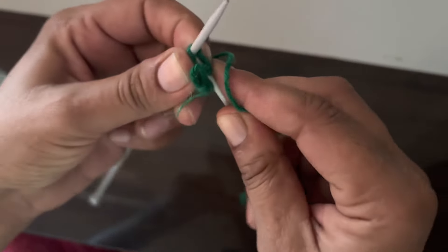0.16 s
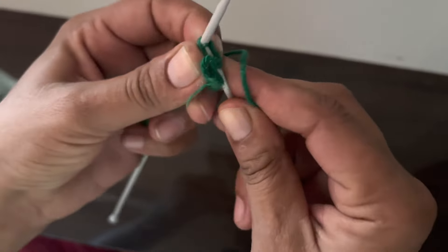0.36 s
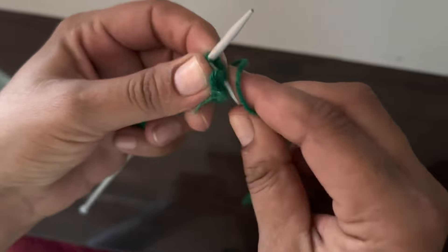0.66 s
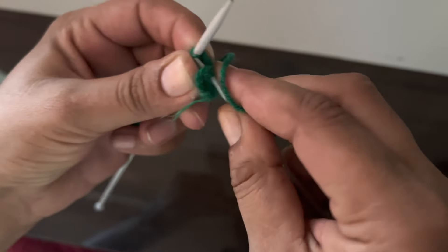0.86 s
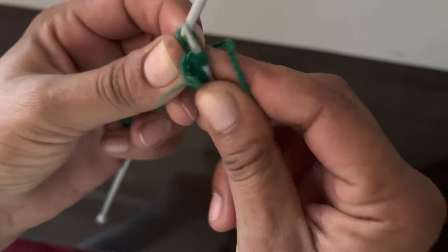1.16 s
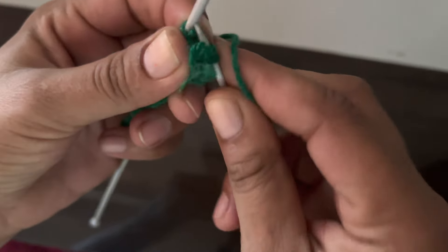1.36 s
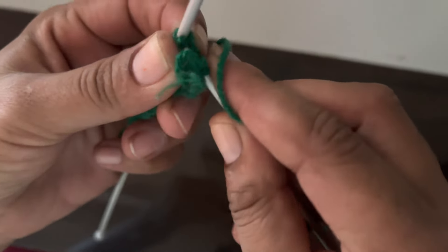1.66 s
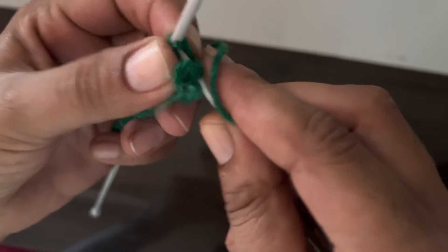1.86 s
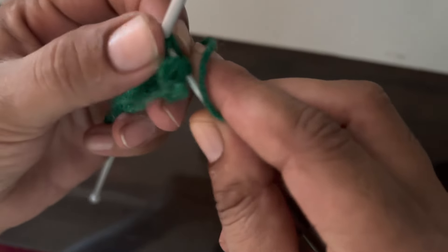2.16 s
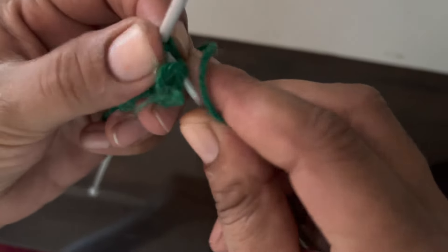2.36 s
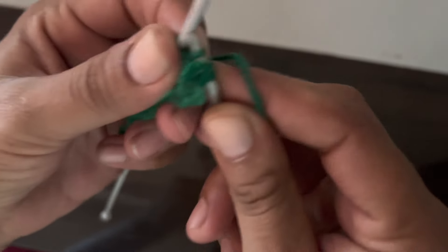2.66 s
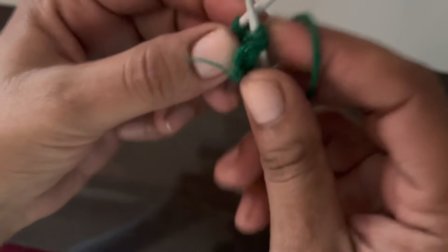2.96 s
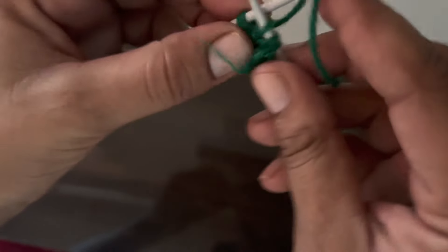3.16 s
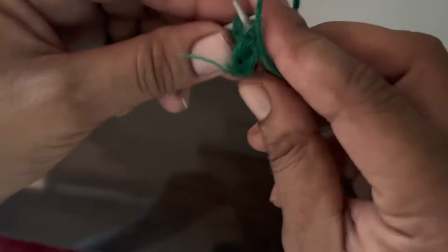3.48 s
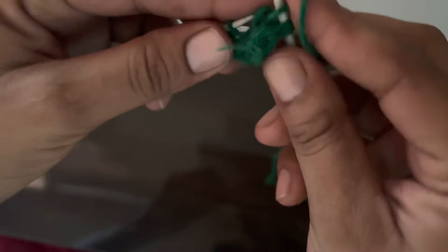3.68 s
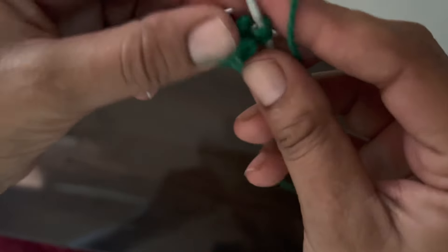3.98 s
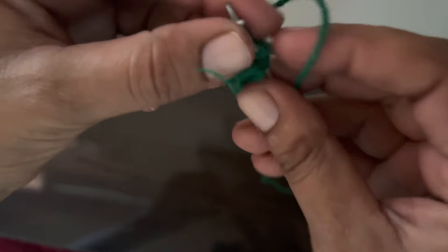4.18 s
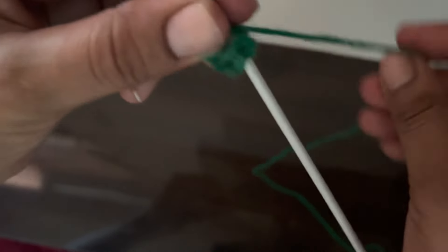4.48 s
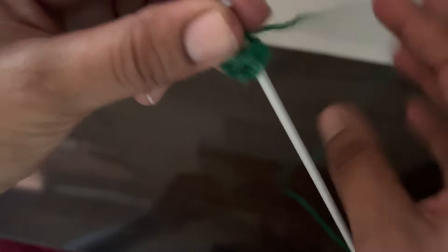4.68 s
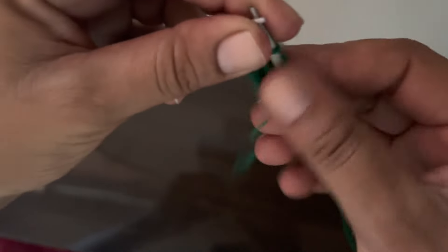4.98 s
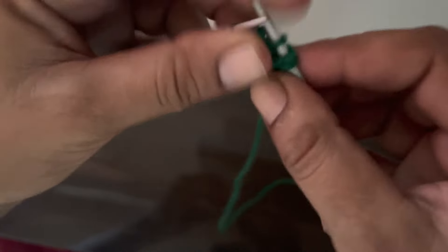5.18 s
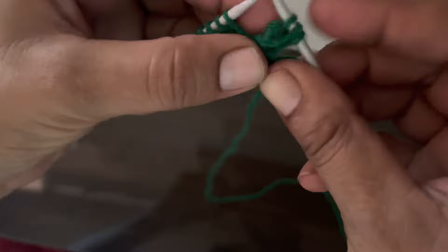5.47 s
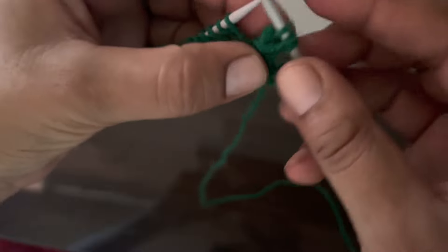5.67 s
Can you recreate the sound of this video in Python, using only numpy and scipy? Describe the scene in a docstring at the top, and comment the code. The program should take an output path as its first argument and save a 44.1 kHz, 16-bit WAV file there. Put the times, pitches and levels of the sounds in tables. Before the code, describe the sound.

Two coated metal knitting needles work through wool close to the microphone, making short, high, hissy scrapes and small irregular ticks in clusters. A low wavering machine hum comes through the walls of the quiet room throughout. Near the start there is a brief distant rattle and a faint squeal of vehicle brakes. Midway come a few dull clicks and two very faint horn toots, and near the end one soft hollow knock.

```python
"""Ticks and scrapes, close, in a quiet room: two coated metal knitting needles working through wool.
Catching fibres and meeting tips ring the needles' damped modes.
A machine hums low through the walls; far off, vehicle brakes squeal and whistle and a horn toots.
There is also a distant rattle, a few dull clicks and one hollow knock.
The phone takes its treble from one microphone port and feeds it to both sides with a small lag."""
import sys
import numpy as np
from scipy import signal
from scipy.fft import rfft, irfft, next_fast_len
from scipy.io import wavfile
from scipy.ndimage import uniform_filter1d

SR = 44100
rng = np.random.default_rng(int(sys.argv[2]) if len(sys.argv) > 2 else 0)


def transcribe(signal):
    """Save signal, clipped to [-1, 1], as a 16-bit WAV file at the path in sys.argv[1]."""
    frames = np.atleast_2d(signal).T
    limited = np.clip(frames, -1, 1)
    pcm = np.round(limited * 32767).astype(np.int16)
    wavfile.write(sys.argv[1], SR, pcm)


N = 257103
T = np.arange(N) / SR
FADE_DB = 15  # swell depth of whistles and toots


def undb(db):
    return 10 ** (np.asarray(db) / 20)


def unit(x):
    return x / np.sqrt(np.mean(x ** 2, axis=-1, keepdims=True))


def pan(db):
    """Stereo gains; db is left minus right."""
    return undb([[db / 2], [-db / 2]])


def ring(x, modes):
    """Sum of resonances (f/Hz, width/Hz, gain/dB), each applied twice for steep skirts."""
    out = 0
    for hz, width_hz, db in modes:
        b, a = signal.iirpeak(hz, hz / width_hz, fs=SR)
        out = out + undb(db) * signal.lfilter(b, a, signal.lfilter(b, a, x))
    return out


def walk(rate_hz, n=N):
    """Random steps, smoothed twice; unit RMS."""
    k = int(SR / rate_hz)
    steps = np.repeat(rng.standard_normal(n // k + 1), k)
    return unit(uniform_filter1d(uniform_filter1d(steps, k), k)[:n])


def correlate(a, b, corr):
    """Stereo from two independent signals; corr < 0 opposes the sides."""
    return np.array([a, corr * a + np.sqrt(1 - corr ** 2) * b])


def noise(corr, n=N):
    """White stereo noise, partly alike on both sides."""
    return correlate(*rng.standard_normal((2, n)), np.clip(corr, 0, 1))


def curves(table):
    """Columns interpolated over the first (t/s), and their slice of the scene."""
    times_s, *columns = np.transpose(table)
    end = int(times_s[-1] * SR) + 1 if times_s[-1] < T[-1] - .01 else N
    at = slice(int(times_s[0] * SR), end)
    return [np.interp(T[at], times_s, c) for c in columns], at


def envelope(start_s, stages_s, levels_db):
    """Straight segments in dB, and their slice of the scene."""
    times_s = start_s + np.cumsum([0, *stages_s])
    (db,), at = curves(list(zip(times_s, levels_db)))
    return db, at


def tone(hz, width_hz, rough, corr):
    """Stereo tone along a pitch curve: part steady, part (rough) random flutter."""
    carrier, n = np.exp(2j * np.pi * np.cumsum(hz) / SR), len(hz)
    sides = []
    for _ in range(2):
        steady = np.exp(2j * np.pi * rng.random())
        flutter = walk(width_hz, n) + 1j * walk(width_hz, n)
        sides.append((1 - rough) * steady + rough * flutter)
    return unit(np.real(carrier * correlate(*sides, corr)))


def machine_hum():
    """Through the walls: a wavering low tone, a steadier one above, narrow bands of rumble."""
    hum_levels = [(0.0, -60), (0.11, -42.5), (0.23, -49.5), (0.28, -69), (0.39, -43), (0.52, -42.5),
                  (0.63, -60.5), (0.66, -49.5), (0.88, -46.5), (0.97, -50), (1.07, -45), (1.12, -48),
                  (1.49, -41.5), (1.7, -64.5), (1.87, -42.5), (2.11, -58), (2.16, -48), (2.39, -48.5),
                  (2.63, -63), (2.69, -50.5), (3.0, -55.5), (3.07, -48), (3.26, -52), (3.43, -40),
                  (3.62, -59.5), (3.88, -40.5), (3.99, -51), (4.12, -42), (4.71, -47.5), (4.77, -42),
                  (4.9, -45.5), (5.24, -42.5), (5.34, -51), (5.52, -42.5), (5.68, -49), (5.73, -62),
                  (5.78, -42), (5.83, -46.5)]  # low tone: t/s, level/dB
    hum_pitch = [(0.0, 45.1), (0.1, 46.35), (1.46, 46.53), (1.64, 44.9), (1.91, 47.56), (3.73, 48.34),
                 (3.78, 47.73), (5.7, 47.9), (5.83, 46)]  # low tone: t/s, f/Hz
    upper_levels = [(0, -68), (1.2, -67.5), (1.4, -60), (1.8, -61.5), (2.0, -70), (2.55, -58.5),
                    (3.0, -63.5), (4.9, -61), (5.1, -67.5), (5.83, -67)]  # upper tone: t/s, level/dB
    drone_bands = [(66.6, 33, -63), (100.9, 14, -58.5), (148.1, 8.6, -74.5), (164, 17, -65.5),
                   (239, 8.7, -77.5), (300.8, 26.7, -72), (359.5, 11, -83.5), (1072, 24, -90)]  # rumble: f/Hz, width/Hz, level/dB
    (low_db,), _ = curves(hum_levels)
    (low_hz,), _ = curves(hum_pitch)
    (upper_db,), _ = curves(upper_levels)
    phase = 2 * np.pi * np.cumsum(low_hz + 0.603 * walk(10)) / SR
    low = np.sqrt(2) * np.sin(phase) * undb(low_db + 1.1 * walk(14))
    upper = tone(hz=np.full(N, 194.9), width_hz=9, rough=0.28, corr=0.97) * undb(upper_db)
    drones = sum(undb(db) * unit(ring(noise(1 - hz / 900), [(hz, width_hz, 0)]))
                 for hz, width_hz, db in drone_bands)
    return low * pan(-1.4) + (drones + upper) * pan(-2.8)


def room_air():
    """Room air and microphone noise; the band of street rumble swells."""
    spectrum = [(31.9, -108, .99, -2), (57.7, -74.5, 1, -3), (128.6, -80.5, 0.91, -3), (243, -86, 0.54, -1),
                (545, -101, 0, -.5), (1160, -108, -.25, -1.5), (2280, -113, 0.13, 1.5),
                (2990, -120, 0.19, 1), (5240, -123, 0, 5), (7800, -127, 0.48, 2), (11000, -132, 0, -5),
                (12200, -129, 0.4, -2.5), (14000, -133, 0, -11.5), (15800, -126, 0.1, 4)]  # noise floor: f/Hz, density/(dB re 1/Hz), L-R correlation, pan/dB
    street_swell = [(0, 2), (.16, -1), (.57, -0.5), (.68, 0), (1.57, 0), (2.0, -2.5), (2.5, -.5),
                    (3.4, -0.5), (3.7, 1), (4.56, -1), (5.5, 0), (5.83, 1)]  # street rumble: t/s, gain/dB
    street_low_hz, street_high_hz = 234, 3400
    n = next_fast_len(N)
    f = np.fft.rfftfreq(n, 1 / SR) + 1
    hz, *columns = np.transpose(spectrum)
    db, corr, pan_db = (np.interp(np.log(f), np.log(hz), c) for c in columns)
    white = correlate(*rfft(rng.standard_normal((2, n))), corr) * np.sqrt(SR / 2)
    sides = white * undb(db) * undb([pan_db / 2, -pan_db / 2])
    band = 1 / (1 + (street_low_hz / f) ** 4) / (1 + (f / street_high_hz) ** 4)
    (swell_db,), _ = curves(street_swell)
    street = irfft(sides * band, n)[:, :N] * undb(swell_db)
    room = irfft(sides * (1 - band), n)[:, :N]
    return (street + room) * undb(0.89 * walk(3.31))


def needle(x, lower_db, middle_db, main_db, top_db):
    """Four groups of damped needle modes, each normalised on white noise, then weighted."""
    # needle modes: f/Hz, width/Hz, gain/dB
    lower = [(2245, 510, 6), (3440, 1200, -3.5), (5210, 3400, 8), (6390, 1030, 11)]
    middle = [(8550, 2600, 0)]
    main = [(11730, 2700, 0.14), (13270, 1840, 0.21)]
    top = [(14570, 5100, 0)]
    white = rng.standard_normal(4096)
    groups = (lower, lower_db), (middle, middle_db), (main, main_db), (top, top_db)
    return sum(undb(db) * ring(x, modes) / np.std(ring(white, modes)) for modes, db in groups)


def scrapes(grain_db=1.5, grain_hz=400, sing_db=-9.5):
    """Fibres catch and slip, so the hiss comes in grains; the free length of needle sings."""
    rustle = [(0.0, -105), (0.16, -94), (0.34, -100), (0.88, -96), (1.15, -87), (1.49, -100), (2.18, -100),
              (2.6, -90), (2.87, -91), (3.44, -82.5), (3.62, -98), (4.29, -86), (4.59, -100), (4.84, -100),
              (5.05, -86.5), (5.83, -96)]  # wool and skin, always moving: t/s, level/dB
    # needle on needle and wool: t/s, rise/s, hold/s, fall/s, hold start/dB, hold end/dB,
    # lower modes/dB, middle mode/dB, top mode/dB, high singing/Hz, low singing/Hz
    strokes = [(0.061, 0.073, 0.085, .04, -89, -84, -7, -10, -12, 11700, 5000),
               (0.488, .025, 0.045, .03, -86, -83, 2.5, -6, -8, 12000, 4900),
               (0.904, .018, 0.0064, 0.053, -71, -74, 0.5, 3.5, 1, 11900, 6150),
               (1.15, 0.0063, 0.058, .024, -59.5, -48.5, -11.5, -6.5, -7, 12560, 5450),
               (1.311, 0.023, 0.018, 0.03, -58.5, -60.5, -10, -6, -9, 11650, 5680),
               (2.37, 0.045, 0.0054, 0.033, -69.5, -72, -5, -1.5, -6, 12050, 5400),
               (2.472, 0.019, .09, .05, -81, -87, 0.5, -4, -6, 11900, 5030),
               (2.635, 0.016, 0.065, 0.016, -69.5, -66, -4, -0.5, 1.5, 12300, 5350),
               (2.785, 0.017, 0.065, 0.0091, -61, -54.5, -13, -4.5, -12, 11500, 6200),
               (3.134, 0.0051, .057, 0.017, -65.5, -68.5, -11, -5, -4, 11400, 5700),
               (3.215, 0.039, .04, 0.022, -78, -79, -2.5, -5, -8, 11900, 4450),
               (3.303, 0.048, 0.059, 0.044, -54.5, -57, -11.5, -6.5, -4, 12070, 5350),
               (3.543, 0.023, 0.015, 0.0086, -62, -54, -16.5, -8.5, -10, 12200, 5780),
               (3.585, 0.0056, .062, 0.028, -76.5, -80.5, 2, 1, -0.5, 12000, 5000),
               (4.17, .02, .045, 0.032, -87, -88, 4, 0, -1, 11900, 4280),
               (4.396, .055, 0.0035, 0.033, -66.5, -64.5, -2, 1, 1.5, 12000, 3700),
               (4.837, 0.029, 0.12, 0.032, -81.5, -84, 2, 1.5, 1, 12150, 4700),
               (5.112, 0.026, 0.031, 0.038, -66.5, -66, -8.5, -1, -0.5, 12350, 5000),
               (5.179, 0.0074, 0.029, .02, -79, -81, 6, 0.5, -3, 12100, 6900),
               (5.673, 0.0032, 0.0031, .012, -63, -63, -3, -2, 0, 11620, 5800)]
    rise_db, fall_db = 26, 22.5
    settle_s, settle_db = .08, 23  # wool settling after a stroke
    light_touch = 0.37, 0.18, .15  # lower, middle, top modes: dB gained per dB below stroke peak
    (rustle_db,), _ = curves(rustle)
    flutter = undb(2.5 * walk(30))
    out = needle(noise(0.27) * flutter, -6, -1, 0, -1.5) * undb(rustle_db)
    for start_s, rise_s, hold_s, fall_s, first_db, last_db, *modes_db, high_hz, low_hz in strokes:
        levels_db = [first_db - rise_db, first_db, last_db, last_db - fall_db,
                     last_db - fall_db - settle_db]
        db, at = envelope(start_s, [rise_s, hold_s, fall_s, settle_s], levels_db)
        n = len(db)
        below_peak_db = max(first_db, last_db) - db
        lower_db, middle_db, top_db = (d + k * below_peak_db for d, k in zip(modes_db, light_touch))
        grain = unit(undb(grain_db * walk(grain_hz, n)))
        hiss = needle(noise(0.41, n) * grain, lower_db, middle_db, -5.5, top_db)
        low = tone(np.full(n, low_hz), width_hz=1000, rough=1, corr=.4)
        high = tone(np.full(n, high_hz), width_hz=900, rough=1, corr=0.83)
        sing = (high + undb(lower_db + 1.5) * low) * grain
        out[:, at] += (hiss + undb(sing_db) * sing) * undb(db)
    return out


def brakes():
    """Brake drums squeal with harmonics, chatter just below the pitch and rasp; thin whistles join."""
    squeals = [
        [(.47, 1332, -81, -84), (.53, 1389, -64.5, -70.5), (.6, 1385, -59, -72), (.68, 1430, -59.5, -75),
         (.78, 1370, -55.5, -73), (.88, 1397, -60.5, -81), (.97, 1396, -70.5, -89), (1.02, 1400, -65.5, -101),
         (1.1, 1382, -83, -103), (1.19, 1390, -73, -100)],
        [(5.76, 1418, -95, -93), (5.79, 1400, -74, -83), (5.83, 1440, -68, -84)],
    ]  # one table per squeal: t/s, f/Hz, tone/dB, rasp/dB
    harmonics_db = [0.5, -21.5, -30, -33, -17.5, -23.5, -26]  # squeal harmonics 1-7: gain/dB
    whistles = [(0.152, 0.13, 0.084, 0.21, 7300, 7270, -83), (0.518, 0.12, 0.27, 0.24, 6750, 6670, -75.5),
                (0.947, 0.083, 0.11, 0.033, 9780, 9470, -84.5), (3.9, 0.1, 0.17, 0.31, 7600, 7700, -76.5),
                (4.181, 0.21, 0.23, 0.23, 6880, 6930, -76), (4.608, 0.11, .15, 0.18, 9434, 9800, -80.5),
                (5.153, 0.11, .2, .12, 9550, 9680, -91.5)]  # t/s, rise/s, hold/s, fall/s, first f/Hz, last f/Hz, level/dB
    rasp_modes = [(2010, 1130, 11.5), (2520, 600, -30), (8700, 3400, -11)]  # f/Hz, width/Hz, gain/dB
    out = np.zeros((2, N))
    for squeal in squeals:
        (hz, db, rasp_db), at = curves(squeal)
        harmonics = sum(undb(gain_db) * tone(k * hz, width_hz=70 + 35 * k, rough=.85, corr=-.6)
                        for k, gain_db in enumerate(harmonics_db, 1))
        chatter = undb(-12) * tone(.95 * hz, width_hz=220, rough=1, corr=-.5)
        rasp = unit(ring(noise(0.37, len(hz)), rasp_modes))
        out[:, at] += (harmonics + chatter) * undb(db) * pan(-3) + rasp * undb(rasp_db)
    for start_s, *stages_s, first_hz, last_hz, db in whistles:
        level_db, at = envelope(start_s, stages_s, [db - FADE_DB, db, db, db - FADE_DB])
        hz = np.linspace(first_hz, last_hz, len(level_db))
        out[:, at] += tone(hz, width_hz=280, rough=.9, corr=0) * undb(level_db)
    return out


def rattle_and_knocks(contact_s=.0012, tail_s=.015, tail_db=-24):
    """A distant rattle, dull clicks, one hollow knock: treble first, then a low ring and a soft tail."""
    hits = [(0.2775, -54, 2, 1810, 1210, 6), (0.2981, -50.5, 0.5, 1860, 1400, 2),
            (.3127, -54, 4, 2190, 1390, 12), (0.329, -50.5, 3.5, 2250, 1410, -2),
            (0.3426, -53, -1, 2100, 1500, 4), (0.7863, -50.5, -6, 2640, 1820, 4),
            (2.482, -68, -12, 2610, 1505, 8), (2.516, -61.5, -12, 2300, 1520, 8),
            (2.633, -64, -4, 2080, 1500, 2), (2.6391, -64.5, 3, 2124, 1490, 6),
            (4.894, -55, -38, 993, 170, -2)]  # t/s, level/dB, treble/dB, ring f/Hz, ring width/Hz, pan/dB
    crack_modes = [(3800, 2200, 0), (5700, 1200, 6), (8200, 750, 7.5), (12700, 3400, -3), (15800, 1700, 1)]  # treble resonances: f/Hz, width/Hz, gain/dB
    body_hz, body_width_hz = 1140, 1060
    out, t = np.zeros((2, N)), T[:2600]
    decay = np.exp(-t / contact_s)
    tail = undb(tail_db) * np.exp(-t / tail_s)
    for start_s, db, treble_db, hz, width_hz, pan_db in hits:
        i = int(start_s * SR)
        contact = noise(0.79, len(t))
        # brighter knocks have more body; the hollow one has almost none
        body = body_hz, body_width_hz, treble_db - 0.12
        low = ring(contact * (t / contact_s * decay + tail), [(hz, width_hz, 0), body])
        high = ring(contact * (decay + tail), crack_modes)
        knock = low / np.abs(low).max() + undb(treble_db) * high / np.abs(high).max()
        out[:, i:i + len(t)] += undb(db) * pan(pan_db) * knock
    return out


def ticks(rise_s=0.00083, decay_s=0.0015):
    """Tips meet: a short rough contact rings the needle modes."""
    taps = [(0.9184, -63.5, -9, -2, -3), (1.157, -35, -9, -11, -16), (1.204, -41, -26, -21, -11),
            (1.216, -39, -22, -18, -9), (1.3286, -48, -19, -17, -20), (1.9108, -59, -5, -3, -12),
            (2.175, -58, 4, 4, 2), (2.6521, -51, -10, -3, -2), (2.717, -52.5, -7, -4, -6),
            (2.798, -46, -10, 1, -4), (2.8414, -41, -26, -9, -20), (2.864, -43.5, -20, -7, -20),
            (3.1354, -35.5, -42, -4, -7), (3.3199, -49.5, -20, -21, -21), (3.3413, -40, -26, -19, -20),
            (3.3503, -48, -21, -25, -12), (3.3609, -37.5, -33, -16, -23), (3.5736, -63, -16, -8, -1),
            (3.5814, -51, -22, 2, -9), (4.0972, -44.5, -18, -4.5, -12), (5.654, -62, -8, -4, -14),
            (5.6757, -41, -16, -3.5, -4)]  # t/s, level/dB, lower modes/dB, middle mode/dB, top mode/dB
    out, t = np.zeros((2, N)), T[:900]
    for start_s, db, lower_db, middle_db, top_db in taps:
        i = int(start_s * SR)
        contact = noise(0.28, len(t)) * (1 - np.exp(-t / rise_s)) * np.exp(-t / decay_s)
        tick = needle(contact, lower_db, middle_db, 0, top_db)
        out[:, i:i + len(t)] += undb(db) * tick / np.abs(tick).max()
    return out


def horn():
    """Two faint blurred toots from the street."""
    toots = [(2.917, .16, 0.14, 0.067, 432, -76.5), (3.537, 0.11, 0.14, 0.11, 432, -70.5)]  # t/s, rise/s, hold/s, fall/s, f/Hz, level/dB
    harmonics_db = [4.5, -11.5]  # horn harmonics 1-2: gain/dB
    out = np.zeros((2, N))
    for start_s, *stages_s, hz, db in toots:
        level_db, at = envelope(start_s, stages_s, [db - FADE_DB, db, db, db - FADE_DB])
        for k, gain_db in enumerate(harmonics_db, 1):
            harmonic = tone(np.full(len(level_db), k * hz), width_hz=48.7, rough=0.69, corr=0.17)
            out[:, at] += harmonic * undb(level_db + gain_db)
    return out


def scene():
    """Needles slightly left, over street, machine and room."""
    needles = (scrapes() + ticks()) * pan(2)
    return needles + rattle_and_knocks() + brakes() + horn() + machine_hum() + room_air()


def record(dry):
    """Above the crossover the right side is the left port's sound, slightly early; the top is cut."""
    crossover_hz, lead_ms, in_phase_hz, cutoff_hz = 8860, .28, 8510, 15800
    n = next_fast_len(N)
    f = np.fft.rfftfreq(n, 1 / SR)
    left, right = rfft(dry, n)
    share = 1 / (1 + (crossover_hz / (f + 1)) ** 16)
    lead = np.exp(2j * np.pi * (f - in_phase_hz) * lead_ms / 1000)
    right = np.sqrt(1 - share ** 2) * right + share * lead * left
    stereo = irfft(np.array([left, right]), n)[:, :N]
    lowpass = signal.ellip(10, .2, 70, cutoff_hz, fs=SR, output="sos")
    return signal.sosfilt(lowpass, stereo)


dry = scene()
out = record(dry)
transcribe(out)
```